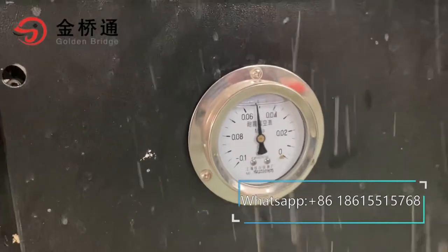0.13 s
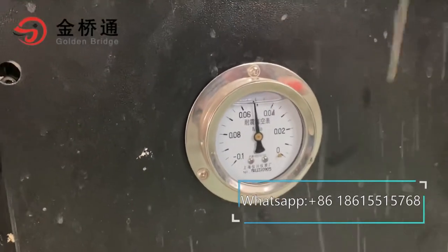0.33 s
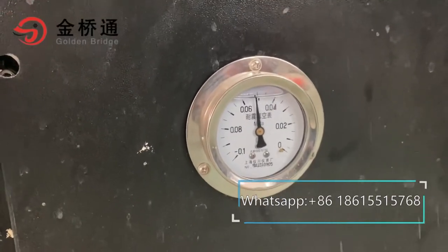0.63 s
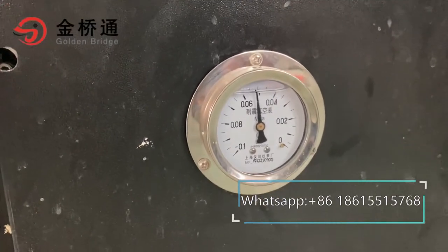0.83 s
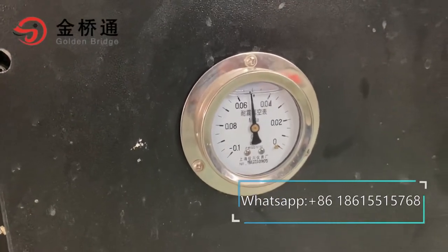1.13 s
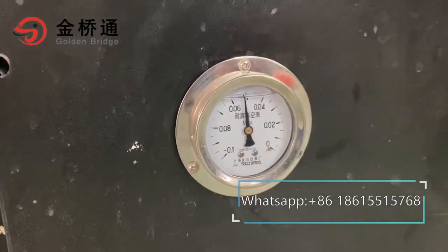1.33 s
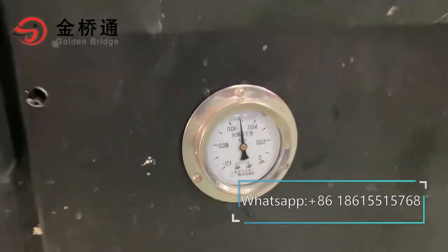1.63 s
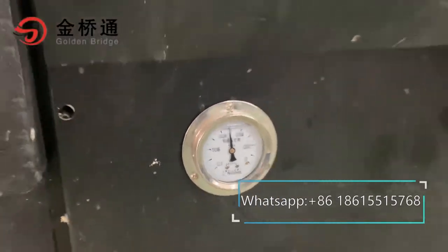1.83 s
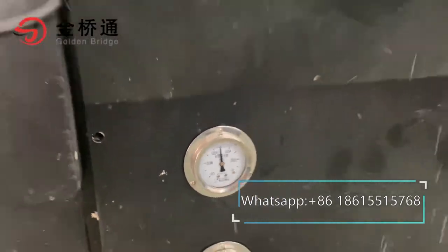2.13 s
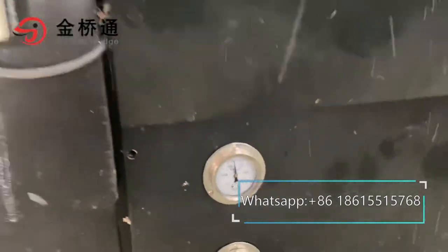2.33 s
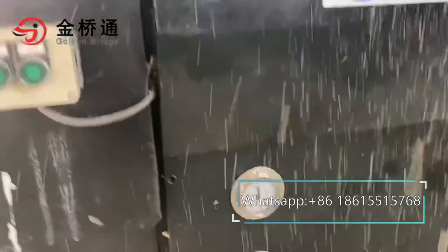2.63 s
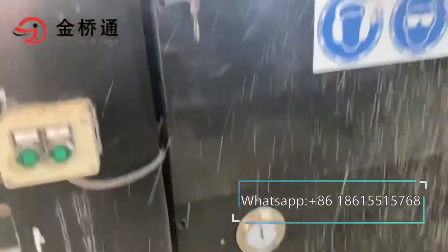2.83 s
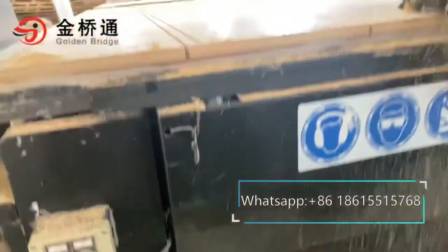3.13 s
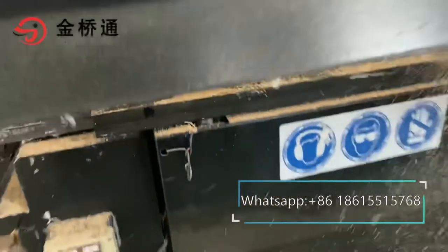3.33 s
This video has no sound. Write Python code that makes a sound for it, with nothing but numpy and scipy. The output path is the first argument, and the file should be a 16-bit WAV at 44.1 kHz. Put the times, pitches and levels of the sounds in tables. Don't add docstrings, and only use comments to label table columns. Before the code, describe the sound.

A vacuum pump roars and hums steadily in a workshop while a spindle whines high above it

```python
import sys
import numpy as np
from scipy import signal
from scipy.io import wavfile
from scipy.ndimage import uniform_filter1d

SR = 44100
rng = np.random.default_rng(int(sys.argv[2]) if len(sys.argv) > 2 else 0)


def volts_from_db(level):
    exponent = np.asarray(level, float) / 20
    return 10 ** exponent


def pcm_store(signal):
    levels = np.round(np.clip(np.atleast_2d(signal), -1, 1) * 32767)
    wavfile.write(sys.argv[1], SR, levels.astype(np.int16).T)


N = 154350

# time in seconds, air hiss in dB, pump rumble in dB, view of the motor in dB.
PHONE_PLACE = [(0, -46, -30, -5.5), (.3, -45, -33.5, -3.5), (.7, -47.5, -31.5, -3.5),
               (1.25, -44.5, -31.5, 0.5), (1.58, -42.5, -31, -1.5), (1.8, -42, -30, 2.5),
               (2.0, -39.5, -31, -1), (2.2, -36, -34.5, 5), (2.4, -41, -35, 1), (2.85, -43.5, -42.5, -2.5),
               (3.1, -44.5, -37.5, -1), (3.2, -49, -37.5, -5), (3.5, -49, -37.5, -7)]


def evened(x):
    return x / np.sqrt(np.mean(abs(x) ** 2) + 1e-20)


def read(points, hz):
    f, value = np.transpose(points)
    return np.interp(np.log(hz + 1), np.log(f + 1), value)


def control(table, t):
    rows = np.transpose(table)
    return [np.interp(t, rows[0], column) for column in rows[1:]]


def twist(hz):
    # frequency in Hz, left lead in radians.
    port_lead = [(20, 0), (450, -.25), (680, -.9), (950, -3.0), (1500, -5.5), (2000, -6.5), (6500, -6.2),
                 (7930, -8.3), (8400, -9.42), (10100, -12.57), (12150, -15.7), (13950, -18.85),
                 (15700, -21.9)]
    return np.interp(hz, *np.transpose(port_lead))


def slow(t, top_hz):
    rates, phases = np.geomspace(.3, top_hz, 12), rng.random((12, 2))
    coarse = np.arange(0, N / SR + .02, .01)
    wander = 0
    for rate, (u, v) in zip(rates, phases):
        real = np.sin(2 * np.pi * (rate * coarse + u))
        imaginary = np.sin(2 * np.pi * (rate * coarse + v))
        wander = wander + (real + 1j * imaginary) / np.sqrt(rate)
    return np.interp(t, coarse, evened(wander))


def swells(t, rows):
    return sum(volts_from_db(db) * np.exp(-((t - middle) / half) ** 4) for middle, db, half in rows)


def tone(turns, lead, gain, pan_db=0, wobble=.15):
    t = np.arange(N) / SR
    left = volts_from_db(pan_db / 2) * np.exp(1j * lead) * (1 + wobble * slow(t, 6.6))
    right = volts_from_db(-pan_db / 2) * (1 + wobble * slow(t, 6.3))
    carrier = np.exp(2j * np.pi * (turns + rng.random()))
    return np.sqrt(2) * (gain * np.array([left, right]) * carrier).real


def ports(a, b, hz, t):
    # frequency in Hz, likeness of the two ports 0-1.
    likeness = [(60, 1), (400, 0.67), (650, 0.77), (950, 0.89), (1200, 0.65), (1600, 0.91), (2100, 0.63),
                (4800, 0.27), (6400, 0.32), (8400, 0.97)]
    # time in seconds, stretch of the port phase as a fraction.
    phone_turn = [(0, -0.17), (1.4, -.12), (2.0, 0.057), (2.6, .04), (3.0, 0.042), (3.5, 0.0087)]
    same = np.clip(read(likeness, hz), 0, 1)[:, None]
    near_notch = np.exp(-np.log((hz + 1) / 1050) ** 2 / 0.09)
    stretch = 1 + np.outer(near_notch, control(phone_turn, t)[0])
    left = a * np.exp(1j * twist(hz[:, None] * stretch))
    right = same * a + np.sqrt(1 - same ** 2) * b
    return np.array([left, right])


def share(power):
    return (power / power.sum())[:, None]


def pump():
    # frequency in Hz, density in dB per Hz.
    rumble_shape, roar_shape, hiss_shape = [(15, -30), (35, -54), (60, -4), (120, -5), (180, -9.5),
                                            (300, -12), (450, -13)], [(200, -8), (520, -10), (1000, -7), (1600, -9),
                                                            (2300, -10), (4000, -11.5), (4700, -13.5)], [(1200, -15), (2500, -8.5),
                                                                          (5000, -3.5), (8000, -4),
                                                                          (10000, -3.5), (12800, -12.5),
                                                                          (14200, -15.5), (15600, -23)]
    # frequency in Hz, width in Hz, gain in dB.
    resonances = [(79, 13.5, 3.5), (110, 15, 5.5), (334, 21, 9.5), (648.4, 69.5, 15.5), (1342, 37, 5),
                  (1783, 163, 6), (1910, 26, 10), (2138, 62, 10.5), (2793, 20, 8.5), (3620, 440, 1.5)]
    frames, hz = N // 512 + 5, np.fft.rfftfreq(2048, 1 / SR)
    t = np.arange(frames) * 512 / SR
    a, b, c, d, patches = rng.standard_normal((frames, len(hz), 5)).T
    patches = uniform_filter1d(patches, size=14, axis=0)
    patches = evened(uniform_filter1d(patches, size=8, axis=1))
    hiss_db, rumble_db, _ = control(PHONE_PLACE, t)
    ducts = 1 + sum(volts_from_db(2 * db) / (1 + (2 * (hz - f) / wide) ** 2) for f, wide, db in resonances)

    rumble = share(volts_from_db(2 * read(rumble_shape, hz)) * (hz < 450) * ducts)
    power = rumble * volts_from_db(2 * (rumble_db + 5.0))
    roar = share(volts_from_db(2 * read(roar_shape, hz)) * ducts * (hz > 120) / (1 + (hz / 5000) ** 8))
    power = power + roar * volts_from_db(2 * (-25 + 0.7 * (hiss_db + 51.5)))
    throat = 1 + (2 * (hz[:, None] - 734) / 117) ** 2
    power = power * volts_from_db(2 * 0.51 * (rumble_db - hiss_db - 10) / throat)
    hiss = share(volts_from_db(2 * read(hiss_shape, hz)) * (hz > 300))
    power = power + hiss * volts_from_db(2 * (hiss_db + 16.5))

    patchy_db = 1.5 * np.minimum(hz / 2500, 1)[:, None] * patches
    balance_db = 0.85 * np.array([1, -1])[:, None, None] * np.tanh(np.log(hz + 1)[:, None] - 7.0)
    z = ports(a + 1j * b, c + 1j * d, hz, t) * np.sqrt(power) * volts_from_db(patchy_db + balance_db)
    return 0.57 * signal.istft(z, nperseg=2048, noverlap=1536)[1][:, :N]


def hum():
    # frequency in Hz, level in dB re rumble, unsteadiness as a ratio.
    motor_tones = [(100.5, -9, 1.4), (247, -13, .9)]
    t = np.arange(N) / SR
    rumble = volts_from_db(control(PHONE_PLACE, t)[1])
    out = 0
    for hz, db, loose in motor_tones:
        gain = rumble * volts_from_db(db) * (1 + loose * slow(t, 25.0))
        out = out + tone(hz * t, 0, gain, -2.2, wobble=0.15)
    return out


def spindle():
    # time in seconds, whine in dB, whine left-right in dB, cutter once a turn in dB, two flutes in dB.
    levels = [(0, -26, -4, -54, -53), (.25, -23.5, -0.5, -49, -33.5), (.4, -27, 8.5, -51, -46.5),
              (1.4, -22.5, 2.5, -53, -40), (1.8, -26.5, 1.5, -64, -38.5), (1.94, -22.5, 5, -58, -38),
              (1.985, -26.5, 9, -33, -45), (2.08, -22, 6, -34.5, -31.5), (2.28, -19.5, -8, -29, -24.5),
              (2.48, -18, -3, -29.5, -29), (2.56, -21.5, -4, -27, -25), (2.86, -18.5, 0.5, -33.5, -27),
              (2.9, -17.5, 0, -42, -28), (2.94, -21.5, -1, -39.5, -41), (3.05, -28.5, -1, -33.5, -34),
              (3.14, -29.5, 0, -37, -28.5), (3.22, -22, -4, -32.5, -28.5), (3.4, -28.5, -2, -41, -33.5),
              (3.5, -30.5, -1, -41, -34)]
    # time in seconds, shaft in Hz, whine's left lead in radians.
    shaft = [(0, 299.66, 1), (.7, 299.75, .7), (1.45, 299.78, 1.4), (1.9, 299.8, .9), (2.1, 299.1, .5),
             (2.45, 299.0, .1), (2.7, 299.33, 0), (3.1, 299.1, -1.1), (3.5, 298.75, -.6)]
    # shaft order, left-right in dB.
    cut_orders = [(4, -14.5), (5, -10.5), (7, -8), (10, 8), (11, 4)]
    # middle in seconds, level in dB, half length in seconds.
    cut_swells = [
        [(2.17, -39.5, 0.16), (2.6, -44, 0.27), (3.35, -46, 0.24)],
        [(2.02, -32.5, 0.039), (2.15, -30, 0.082), (2.52, -35.5, 0.21), (3.03, -38, 0.14), (3.38, -43.5, 0.17)],
        [(2.2, -42, 0.12), (2.62, -35, 0.27), (3.07, -35, 0.14), (3.35, -35, 0.17)],
        [(2.3, -50, .3)],
        [(2.3, -59, 0.25)],
    ]
    # shaft order, steady level in dB.
    other_orders = [(3, -41), (7, -59.5), (8, -53), (9, -41), (12, -49.5), (15, -73), (18, -53), (21, -57),
                    (24, -62), (27, -81), (30, -54), (33, -75)]
    other_leads = [-2.35, -.5, 0, 2.7, .2, .4, -.4, 0, 0, -1.5, 1, 0]
    # middle in seconds, level in dB, half length in seconds.
    other_swells = [
        [(1.4, -43, 0.36), (1.77, -33, 0.13), (2.42, -38, 0.12), (2.92, -25, .13), (3.35, -28.5, 0.23)],
        [(1.4, -62, 0.2)],
        [(1.54, -42.5, 0.3), (0.49, -63, 0.26)],
        [(1.66, -38, 0.17), (1.3, -40, 0.22)],
        [(.03, -35, .12), (.36, -39.5, 0.16), (.65, -44, 0.22), (1.7, -40.5, .08)],
        [(1.45, -48, 0.23), (1.78, -37.5, .1)],
        [(1.4, -45.5, 0.23), (1.68, -40, 0.13)],
        [(1.7, -57, 0.18)],
        [(1.55, -48.5, 0.24)],
        [(1.7, -54, .2)],
        [(1.65, -50, 0.095)],
        [(1.7, -50, 0.081)],
    ]
    t = np.arange(N) / SR
    whine_db, pan_db, cut_db, flute_db = control(levels, t)
    hz, lead = control(shaft, t)
    turns, view = np.cumsum(hz) / SR, volts_from_db(control(PHONE_PLACE, t)[2])

    out = tone(6 * turns, lead, volts_from_db(whine_db), pan_db, wobble=0.14)
    out = out + tone(turns, -0.14, volts_from_db(cut_db), -0.88, wobble=0.068)
    out = out + tone(2 * turns, -0.5, volts_from_db(flute_db - 0.4), wobble=0.23)
    for (order, lr_db), rows in zip(cut_orders, cut_swells):
        chatter = 1 + .3 * slow(t, 40)
        out = out + tone(order * turns, lead / 2, swells(t, rows) * chatter, lr_db, wobble=0.21)
    for (order, db), rows, ahead in zip(other_orders, other_swells, other_leads):
        gain = view * volts_from_db(db) + swells(t, rows)
        out = out + tone(order * turns, ahead + .7 * (lead - 1), gain)
    return out


def inverter():
    whistle_hz, whistle_db = [3367, 3967, 6734, 7033, 7633, 7934, 10100, 10400, 10698, 11600, 13600, 13937,
                              14271, 14734], [-46, -49, -46, -51, -61, -40.5, -56, -48.5, -54, -59, -64,
                                                  -60, -60, -51]
    # middle in seconds, level in dB, half length in seconds.
    whistle_swells = [
        [(.25, -45, 0.39), (1.3, -48, 0.44)],
        [(.58, -35.5, 0.29), (1.2, -58, .15), (1.9, -50.5, 0.34), (2.62, -44, 0.056)],
        [(.03, -41, 0.049), (.55, -38.5, 0.32), (1.87, -44.5, 0.16), (2.28, -39, 0.11), (2.9, -45, .12)],
        [(.55, -46.5, 0.13), (1.25, -45, .1), (2.4, -46, .15), (2.8, -50, 0.18)],
        [(1.75, -39, 0.17), (2.3, -41, 0.32)],
        [(.05, -45, 0.13), (.5, -39.5, 0.14), (1.25, -40, 0.44), (1.72, -33.5, 0.052), (2.3, -49, 0.41)],
        [(1.8, -58, .3)],
        [(.35, -44.5, 0.43), (1.6, -45, 0.17), (2.15, -44, 0.37), (2.9, -43, 0.15)],
        [(0.58, -60, 0.27)],
        [(0.74, -54, .4)],
        [],
        [(.1, -54, .15), (1.2, -68, 0.27)],
        [],
        [],
    ]
    ripple_hz, ripple_db = [166.4, 134], [-26, -19.5]
    t = np.arange(N) / SR
    view = volts_from_db(control(PHONE_PLACE, t)[2])
    ripple = 1 + sum(2 * volts_from_db(db) * np.cos(2 * np.pi * hz * t) for hz, db in zip(ripple_hz, ripple_db))
    warble = .08 * np.sin(2 * np.pi * ripple_hz[0] * t + 1)
    out = 0
    for hz, db, rows in zip(whistle_hz, whistle_db, whistle_swells):
        turns = hz * t + warble * (hz > 5000)
        gain = ripple * (view * volts_from_db(db) + swells(t, rows))
        out = out + tone(turns, twist(hz), gain)
    return out


def chips():
    chips_per_s, plunge_s, span_s = 500, 2.16, .2
    t = np.arange(N) / SR
    flurry = np.exp(-((t - plunge_s) / span_s) ** 2) * volts_from_db(2.7 * slow(t, 29.7).real)
    strength = volts_from_db(2.1 * np.minimum(rng.exponential(1, (2, N)), 4))
    hits = (rng.random((2, N)) < chips_per_s / SR) * strength
    u = np.arange(500) / SR
    grain = rng.standard_normal((2, 500)) * volts_from_db(-60 * u / 0.031)
    band = signal.butter(2, [1300, 5200], "bandpass", fs=SR, output="sos")
    rattle = signal.oaconvolve(hits, grain, axes=1)[:, :N]
    raw = evened(signal.sosfilt(band, rattle))
    return volts_from_db(-35) * flurry * (raw + raw[::-1])


def scene():
    return pump() + hum() + spindle() + inverter() + chips()


def top_cut(x):
    return signal.sosfilt(signal.butter(12, 15960, fs=SR, output="sos"), x)


def record(dry):
    low_pass = signal.firwin(511, 15900, window=("kaiser", 9), fs=SR)
    mix = signal.oaconvolve(dry, low_pass[None], "same")
    return top_cut(mix)


dry = scene()
out = record(dry)
pcm_store(out)
```